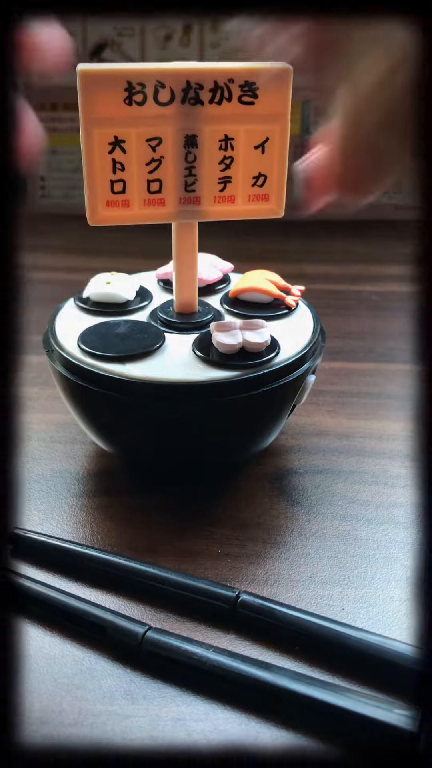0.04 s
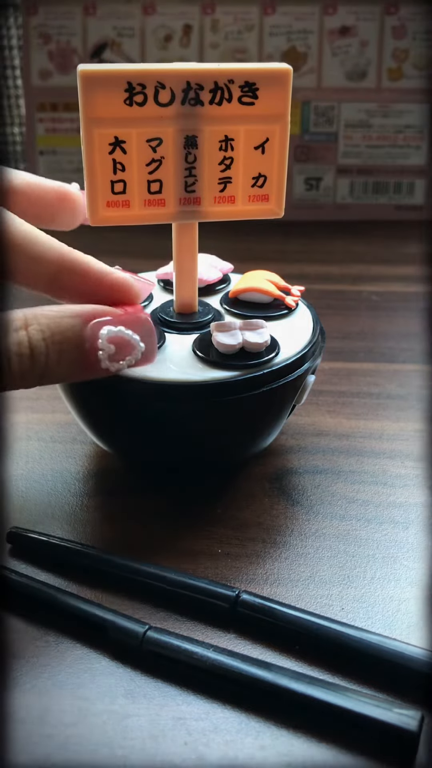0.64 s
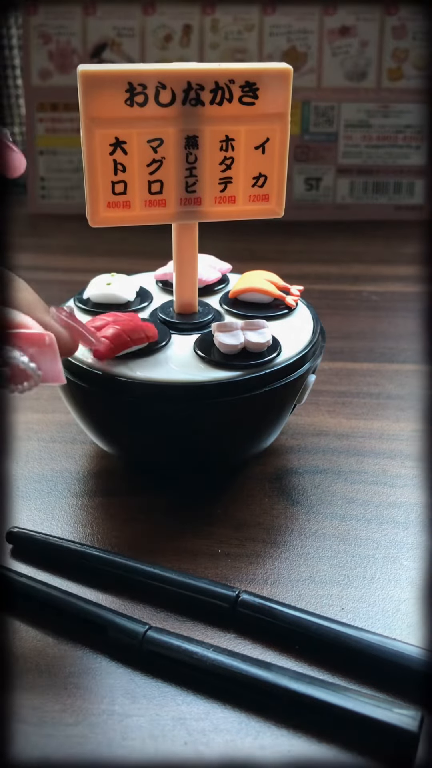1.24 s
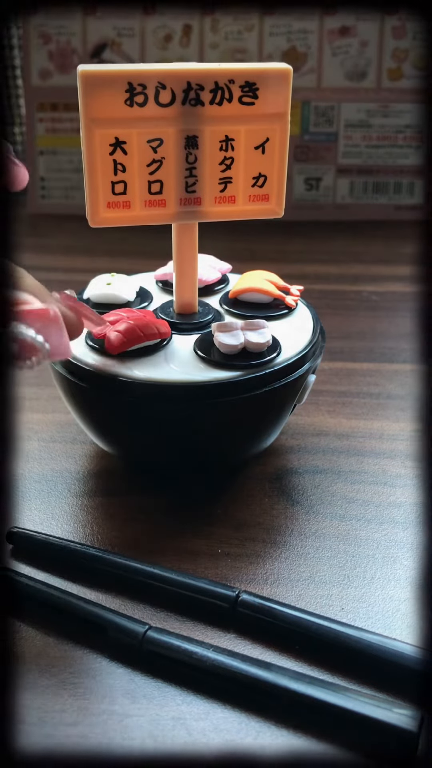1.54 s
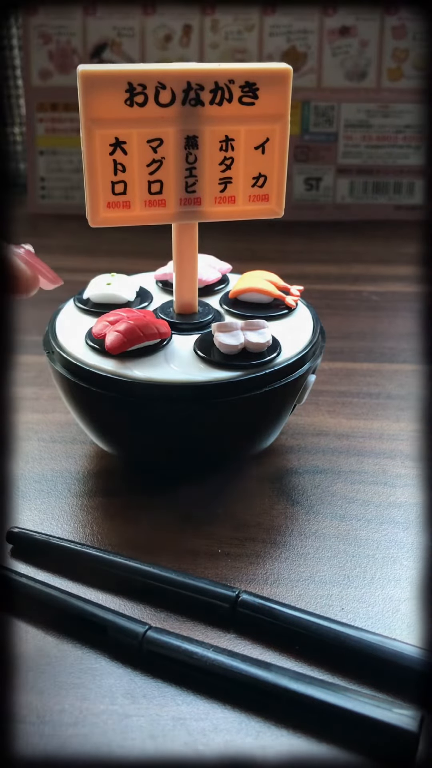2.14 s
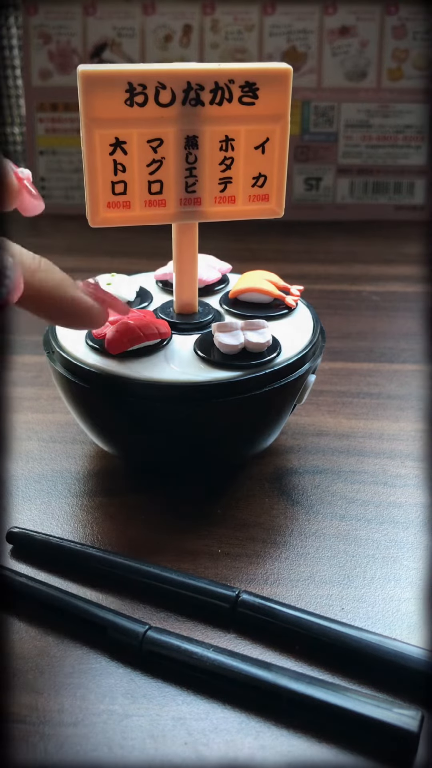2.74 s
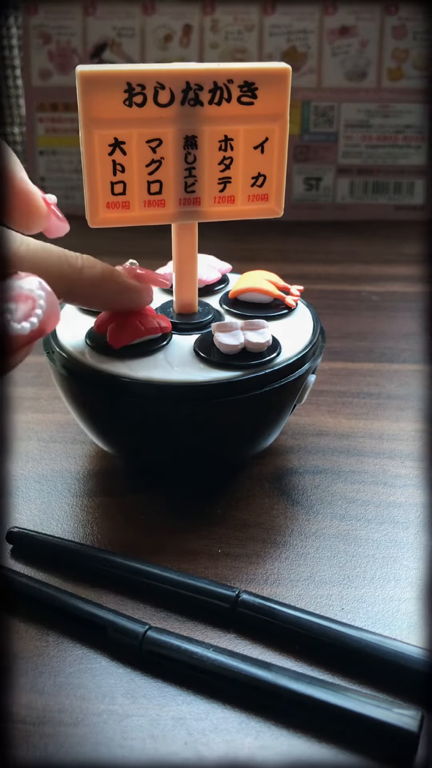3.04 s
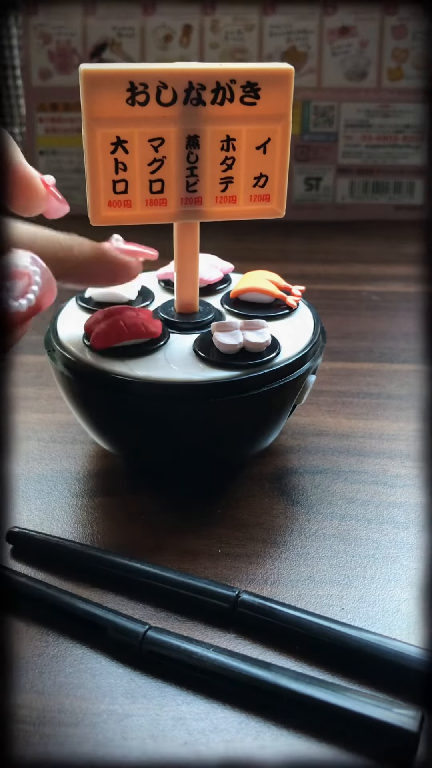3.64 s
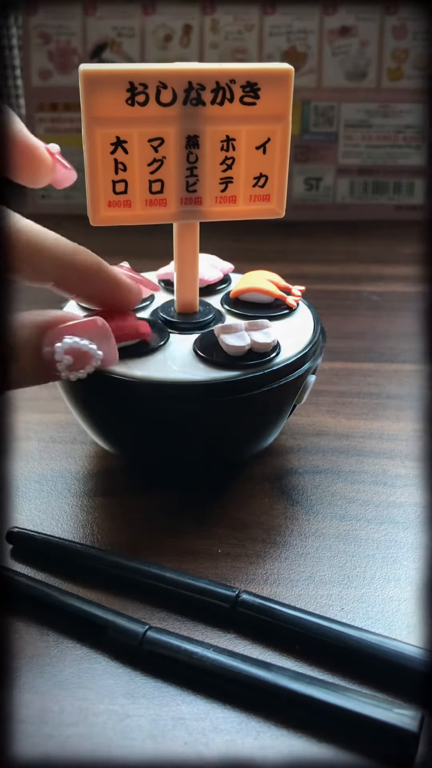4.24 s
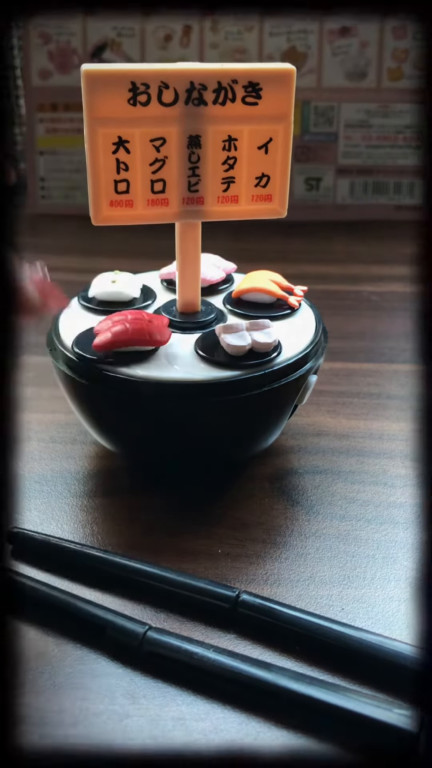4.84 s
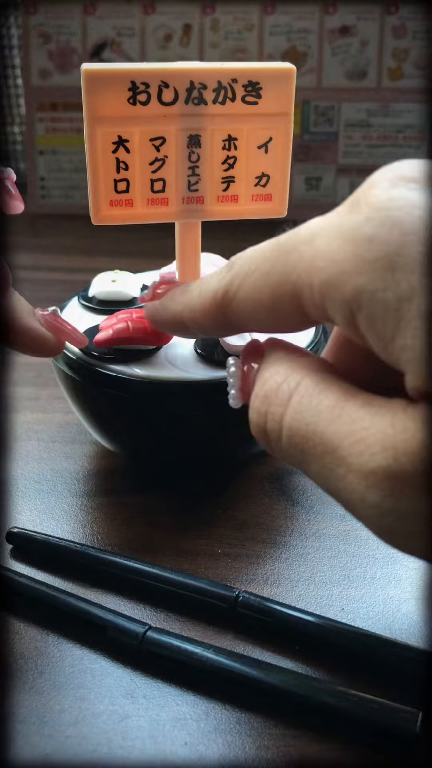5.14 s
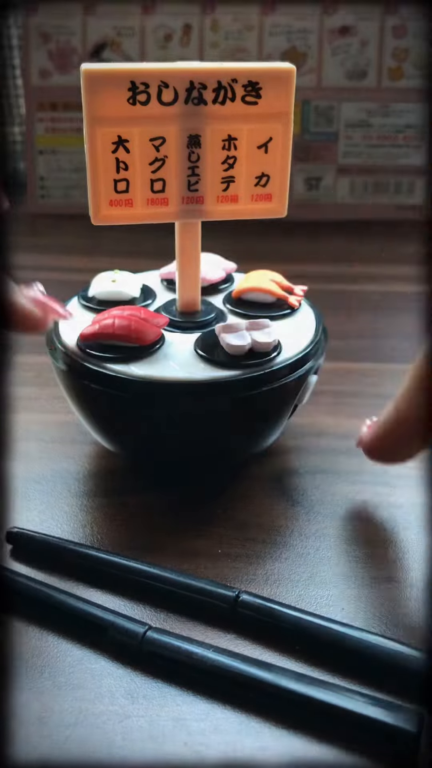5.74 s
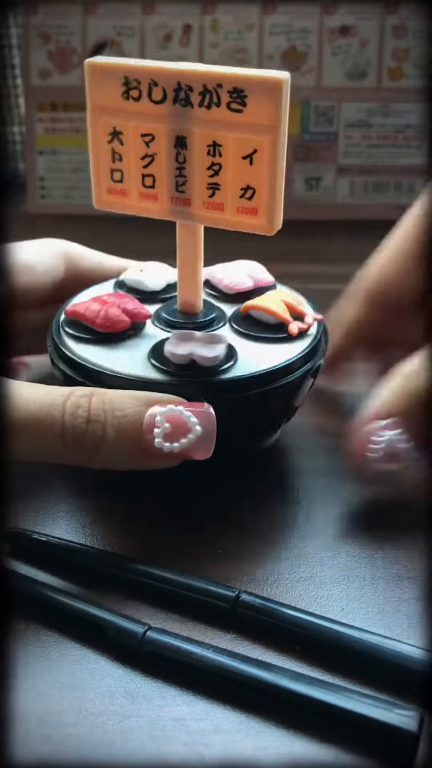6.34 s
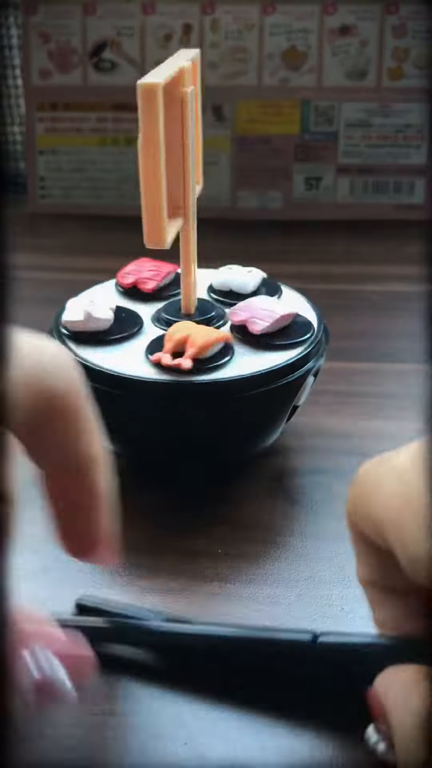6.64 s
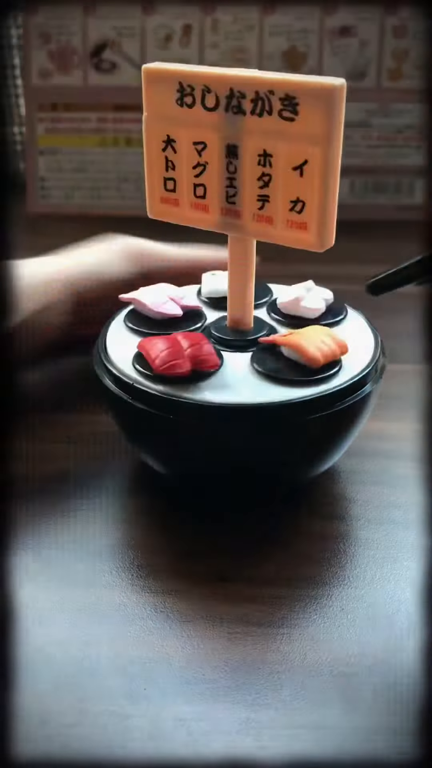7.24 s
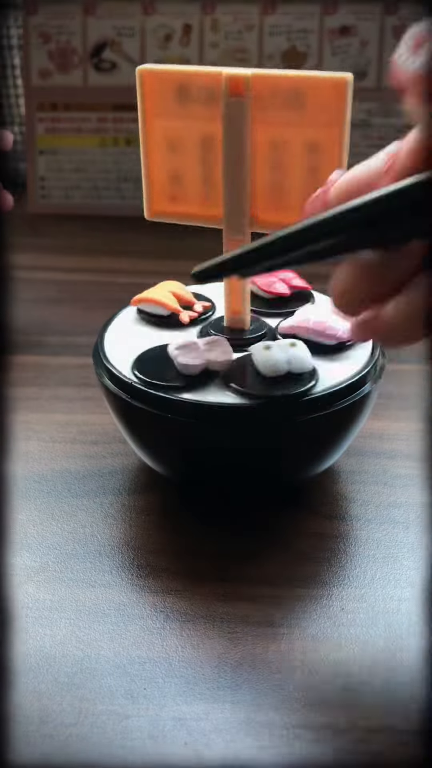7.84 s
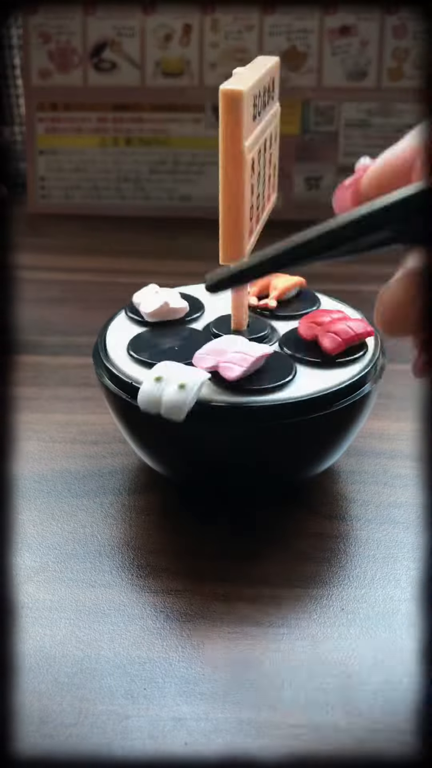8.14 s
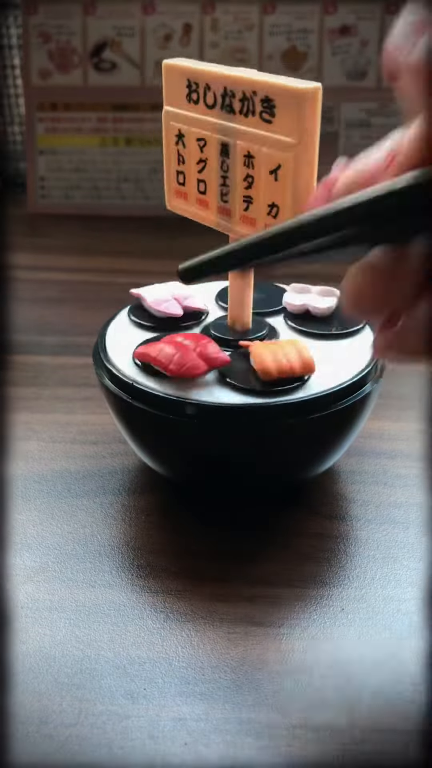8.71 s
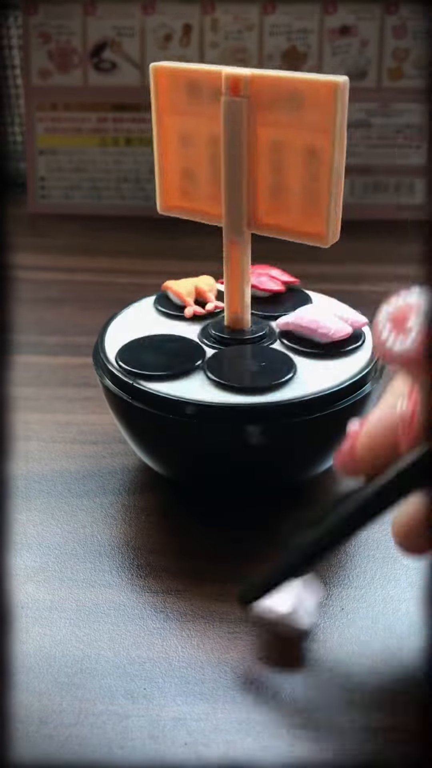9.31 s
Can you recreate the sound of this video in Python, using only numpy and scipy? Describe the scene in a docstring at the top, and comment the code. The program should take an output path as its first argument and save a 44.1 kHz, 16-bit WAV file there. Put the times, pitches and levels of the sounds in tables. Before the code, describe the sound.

Light ticks, brief scrapes and soft fingertip brushes come from a small plastic toy handled close up on a wooden table, over low room noise. Then its turntable starts to spin and a much louder, steady hiss takes over, fluttering slightly and dipping twice between pushes. Chopsticks knock and rub against the toy a few times as it turns, and the hiss lasts to the end.

```python
"""Short scrapes and clicks ring a small hollow plastic turntable on a wooden table in a quiet room.
Long nails set a piece on it and nudge the others; each contact drives the modes of bowl, deck and edges.
Then the deck is pushed round three times, hissing as plastic slides on plastic, while chopsticks poke
at the pieces. The hiss flutters, sags, snags and changes colour as the deck turns."""
import sys
import numpy as np
from scipy import signal
from scipy.fft import rfft, irfft
from scipy.io import wavfile

SR = 44100
rng = np.random.default_rng(int(sys.argv[2]) if len(sys.argv) > 2 else 0)


def file_out(sig):
    """Save sig as 16-bit WAV at sys.argv[1]."""
    # one column per channel
    cols = np.atleast_2d(sig).T
    # limit, then scale
    lim = np.clip(cols, -1, 1)
    pcm = np.round(lim * 32767).astype(np.int16)
    wavfile.write(sys.argv[1], SR, pcm)


N = 422037
TIME_S = np.arange(N) / SR
FREQS_HZ = np.arange(2049) * SR / 4096 + 1
BOWL_TOP_HZ, DECK_TOP_HZ, TOP_HZ = 613, 2190, 15850

# Modes of the toy. Each row: frequency in Hz, width in Hz, relative level in dB.
TOY_MODES = [(344.7, 35, -4.5), (445, 85, -15.5), (874, 230, -15.5), (1056, 300, -9), (1430, 130, -10),
             (1656, 620, -13), (2190, 230, -11), (2466, 270, -11.5), (3290, 1320, -10.5),
             (3530, 190, -10.5), (4140, 680, -10), (4634, 520, -4.5), (5380, 650, -3), (6097, 540, 0.5),
             (6760, 600, -3), (7660, 660, -5), (8430, 930, -5.5), (9085, 220, 0.5), (9590, 820, -4),
             (11300, 2100, -6), (12800, 500, -5), (14100, 3100, -7), (15700, 670, -24)]
# Room noise. Each row: frequency in Hz, relative density in dB.
ROOM_SPECTRUM = [(20, -34), (50, -15), (95, -14.5), (135, -3.5), (175, -0.5), (260, -3.5), (400, -6),
                 (560, -9.5), (780, -22.5), (1500, -21.5), (2300, -28.5), (4000, -38), (8000, -42),
                 (15500, -41.5)]
# Moving hands. Each row: time in seconds, level in dB.
RUSTLE_LEVELS = [(0, -71), (2.1, -69.5), (2.3, -75), (4.0, -76), (4.7, -69.5), (7.2, -73.5), (9.57, -105)]
# Thin swishes. Each row: middle in seconds, nominal length in seconds, level in dB.
SWISHES = [(.036, 0.018, -76.5), (.118, 0.064, -76.5), (.255, .02, -76), (5.852, .02, -71),
           (5.972, .012, -65)]
# Hard contacts. Each row: start in seconds, deck level in dB, edge level in dB, edge tilt in dB/octave.
CLICKS = [(0.246, -52, -72, -15), (0.264, -48, -75, 0), (0.438, -54, -71, -6), (0.796, -43, -47, 0),
          (0.8825, -58, -57, -40), (0.9523, -60, -58, -24), (1.3757, -48, -49, -24),
          (2.0112, -55, -50.5, -10), (2.12, -52, -58.5, 5), (3.4165, -61.5, -71, -5),
          (3.8473, -54, -58, -23), (3.886, -48.5, -53, -3), (3.951, -77, -65, -23), (4.0746, -57, -73, -9),
          (4.3304, -70, -67, -8), (4.378, -58, -62, -6), (4.477, -49, -49, 2), (4.5607, -49, -43, -9),
          (5.412, -53, -72, -2), (5.429, -60, -65, -18), (5.5085, -56, -63, -9), (5.59, -66, -69.5, -11),
          (5.877, -45, -65, -14), (6.0007, -48, -51, 0), (6.244, -55, -58, -7), (6.4926, -40, -23.5, 16),
          (6.497, -45, -35, 6), (6.7543, -34.5, -41, -8), (6.7604, -36, -52, -7), (6.9274, -44, -30.5, 10),
          (8.229, -32.5, -27, -9), (8.687, -35.5, -55, -8), (9.3504, -31.5, -28.5, -29)]
# Passing fingertips. Each row: middle in seconds, nominal length in seconds, level in dB.
BRUSHES = [(.262, 0.038, -54), (.295, 0.038, -60), (.889, 0.033, -49), (.915, 0.031, -48.5),
           (4.14, 0.053, -67), (4.825, 0.053, -54.5), (5.85, 0.053, -54.5), (5.879, 0.039, -47),
           (5.91, 0.085, -55)]
# Fingertip colour. Each row: frequency in Hz, relative density in dB.
BRUSH_SPECTRUM = [(400, -32), (750, -7), (1080, 4), (1450, 3), (1950, -8.5), (2400, -7.5), (3200, -17),
                  (4500, -27), (8000, -38), (15000, -37)]
# Nail drags. Each row: middle and nominal length in seconds, bowl and base edge level in dB,
# ring of the piece in Hz.
NAIL_DRAGS = [(0.807, .038, -42.5, -57, 4770), (1.069, 0.043, -76, -84, 6000),
              (1.241, .026, -55.5, -84, 4400), (1.369, 0.032, -52, -63, 4770),
              (1.482, .018, -61.5, -81, 4730), (2.014, 0.025, -63, -63.5, 3430),
              (2.121, 0.027, -54, -69.5, 4500), (3.326, .028, -53.5, -73, 6140),
              (3.419, 0.029, -57, -84, 5350), (3.483, 0.042, -59.5, -86, 5310),
              (3.642, .032, -53.5, -62, 6200), (3.851, 0.031, -55.5, -70, 4900),
              (3.886, .032, -52.5, -66.5, 4870), (3.954, .017, -68, -79.5, 5340),
              (4.078, 0.018, -57, -81, 4480), (4.334, 0.037, -59, -82, 5110),
              (4.473, .028, -53, -63.5, 4570), (4.561, 0.034, -53.5, -62.5, 5070),
              (4.69, 0.032, -56, -71.5, 4940), (5.046, 0.025, -55, -81, 4850),
              (5.439, 0.069, -59, -88, 4550), (5.509, 0.026, -58.5, -75.5, 5100),
              (6.105, 0.027, -56.5, -76, 3380), (6.179, .038, -62, -79, 4500)]
# Humming rubs. Each row: middle and nominal length in seconds, hum level in dB, hum in Hz.
RUBS = [(0.96, 0.034, -47, 1350), (2.042, 0.053, -57, 474), (2.088, 0.032, -56, 437),
        (5.966, 0.038, -55, 390), (6.008, 0.056, -50.5, 402), (6.277, 0.028, -49.5, 1044),
        (6.366, 0.048, -53.5, 347), (6.49, .036, -45.5, 1280), (7.316, .046, -45.5, 1550),
        (7.363, 0.033, -38.5, 1075), (7.367, .026, -43, 1420), (7.766, .036, -57.5, 1030),
        (7.867, 0.027, -52.5, 1045), (8.017, .044, -55, 1155), (8.103, 0.035, -51, 1090),
        (8.695, 0.027, -48.5, 1100), (8.868, 0.035, -49.5, 1045), (8.989, 0.031, -52, 1080)]
# Table bumps. Each row: middle in seconds, nominal length in seconds, level in dB.
BUMPS = [(4.87, 0.039, -64), (7.28, 0.036, -70)]
# Deck pushes. Each row: start and end in seconds, base level in dB, sag in dB/s, run-down in seconds,
# ripple rate in Hz, time in seconds when the ringing side of the seat comes round.
PUSHES = [(6.269, 7.14, -36, -5.5, .1, 12, 6.7), (7.291, 8.362, -36, -.7, 0.07, 9.9, 7.54),
          (8.345, 9.7, -36, -1.2, .05, 6.93, 8.98)]
# A hand holds and stiffens the bowl. Each row: time in seconds, grip from 0 to 1.
GRIP = [(6.48, .95), (6.56, 0.94), (7.25, 0.13)]
# Deck snags. Each row: middle in seconds, length in seconds, hiss change in dB.
SNAGS = [(6.757, .03, -5), (6.967, 0.029, -6.5), (7.384, 0.066, -4.5), (7.649, 0.019, -3),
         (8.383, 0.038, -7), (8.752, 0.061, -6), (9.042, 0.027, -8), (9.43, 0.037, -3.5)]
# Short deck jerks. Each row: middle in seconds, length in seconds, base level in dB.
JERKS = [(7.017, 0.044, -45), (7.181, 0.025, -61.5), (7.268, .011, -34), (7.305, 0.015, -55),
         (7.49, 0.15, -53.5), (8.348, 0.0088, -52), (8.408, .008, -39)]


def undb(db):
    """Decibels to gain."""
    return 10 ** (np.asarray(db) / 20)


def unit(x):
    """Scale to rms 1."""
    return x / np.sqrt(np.mean(x ** 2) + 1e-20)


def add(out, start_s, x):
    """Mix x into out."""
    i = max(int(start_s * SR), 0)
    x = x[:max(N - i, 0)]
    out[i:i + len(x)] += x


def walk(rate_hz):
    """Random points joined by lines, rms 1."""
    points = rng.standard_normal(1024)
    return unit(np.interp(TIME_S * rate_hz, np.arange(len(points)), points))


def band(hz, lo_hz, hi_hz, order=4):
    """Band-pass gain."""
    return 1 / np.sqrt((1 + (lo_hz / hz) ** (2 * order)) * (1 + (hz / hi_hz) ** (2 * order)))


def colour(hz, spectrum):
    """Gain interpolated between (Hz, dB) points."""
    points_hz, db = np.transpose(spectrum)
    return undb(np.interp(np.log(hz), np.log(points_hz), db))


def causal(gain):
    """Minimum-phase, unit-energy response for a gain over FREQS_HZ."""
    cepstrum = irfft(np.log(gain + 1e-6))
    half = len(cepstrum) // 2
    cepstrum[1:half] *= 2
    cepstrum[half + 1:] = 0
    ring = irfft(np.exp(rfft(cepstrum)))[:half]
    return ring / np.linalg.norm(ring)


def drive(force, ring, db, length_s):
    """Force through a response, with the energy of db rms held for length_s."""
    sound = signal.fftconvolve(force, ring)
    return sound / np.linalg.norm(sound) * undb(db) * np.sqrt(length_s * SR)


def background(room_db=-60.5):
    """Steady room noise and the soft rustle of hands."""
    hz = np.arange(N // 2 + 1) * SR / N + 1
    room = irfft(rfft(rng.standard_normal(N)) * colour(hz, ROOM_SPECTRUM), N)
    hands = irfft(rfft(rng.standard_normal(N)) * band(hz, 780, 990, order=2), N)
    hands_db = np.interp(TIME_S, *np.transpose(RUSTLE_LEVELS)) + 1.4 * walk(16)
    return unit(room) * undb(room_db + .5 * walk(5.3)) + unit(hands) * undb(hands_db)


def stroke(length_s, grain_db):
    """Dense, uneven micro-slips swell and fade with the pressure."""
    slips = rng.standard_normal(8192) * undb(grain_db * rng.exponential(size=8192))
    count = int(np.clip(1.55 * length_s * SR, 16, len(slips)))
    return slips[:count] * np.hanning(count)


def soft_strokes(table, gain, grain_db):
    """Contacts too soft to ring the plastic, all of one colour."""
    out, ring = np.zeros(N), causal(gain)
    for middle_s, length_s, db in table:
        force = stroke(length_s, grain_db)
        add(out, middle_s - len(force) / SR / 2, drive(force, ring, db, length_s))
    return out


def swishes():
    """Thin, high swishes, as of dry skin on skin."""
    return soft_strokes(SWISHES, band(FREQS_HZ, 6000, 15000, order=2), grain_db=3)


def resonance(hz, width_hz):
    """Gain of one mode; low bowl modes have gentler skirts and answer sooner."""
    detune = (FREQS_HZ ** 2 - hz ** 2) / (FREQS_HZ * width_hz)
    gain = 1 / (1 + detune ** 2)
    return gain ** .7 if hz < BOWL_TOP_HZ else gain


def toy_ring(lo_hz, hi_hz, spot_spread_db=0, tilt_db_oct=0, stiffening=1, floor_db=-27):
    """One register of the toy; the spot touched weights the modes, stiffening raises their pitch."""
    spots_db = spot_spread_db * rng.standard_normal(len(TOY_MODES))
    power = sum((undb(db + spot_db) * resonance(stiffening * hz, width_hz)) ** 2
                for (hz, width_hz, db), spot_db in zip(TOY_MODES, spots_db))
    tilt = undb(tilt_db_oct * np.log2(np.clip(FREQS_HZ, 4500, 13000) / 6000))
    return causal(np.sqrt(power + undb(floor_db) ** 2) * band(FREQS_HZ, lo_hz, hi_hz) * tilt)


def touch(force, levels_db, length_s, tilt_db_oct, spot_spread_db):
    """A force rings hollow bowl, flat deck and hard edges; levels_db is in that order."""
    registers = [(250, BOWL_TOP_HZ, 0), (BOWL_TOP_HZ, DECK_TOP_HZ, 0), (DECK_TOP_HZ, TOP_HZ, tilt_db_oct)]
    return sum(drive(force, toy_ring(lo_hz, hi_hz, spot_spread_db, tilt), db, length_s)
               for (lo_hz, hi_hz, tilt), db in zip(registers, levels_db))


def click(levels_db, tilt_db_oct, chatter=.24, decay_s=.001):
    """A sharp blow with brief chatter behind it."""
    force = chatter * rng.standard_normal(400) * np.exp(-TIME_S[:400] / decay_s)
    force[0] += 1
    return touch(force, levels_db, .0035, tilt_db_oct, spot_spread_db=1)


def clicks(bowl_offset_db=-8):
    """Nails and chopsticks strike deck and edges; the bowl answers more softly."""
    out = np.zeros(N)
    for start_s, deck_db, edge_db, tilt_db_oct in CLICKS:
        add(out, start_s, click((deck_db + bowl_offset_db, deck_db, edge_db), tilt_db_oct))
    return out


def brushes():
    """Fingertips brush past with a dull swish."""
    return soft_strokes(BRUSHES, colour(FREQS_HZ, BRUSH_SPECTRUM), grain_db=2)


def scrape(length_s, levels_db, ring_hz, ring_db):
    """Slips drive the toy and two modes of the touched part. Returns sound and time to mid-stroke."""
    force = stroke(length_s, grain_db=2)
    body = touch(force, levels_db, length_s, tilt_db_oct=2, spot_spread_db=2.5)
    width_hz = .17 * ring_hz
    modes = resonance(ring_hz, width_hz) + undb(-6) * resonance(.732 * ring_hz, width_hz / 2)
    part = drive(force, causal(modes * band(FREQS_HZ, 254, TOP_HZ)), ring_db, length_s)
    return body + part, len(force) / SR / 2


def nails(catch_boost_db=(2.5, 5.5, 8), lead_s=.002):
    """A nail drags over a piece and catches half way with a click."""
    out = np.zeros(N)
    for middle_s, length_s, bowl_db, edge_db, ring_hz in NAIL_DRAGS:
        deck_db = bowl_db + .32 * (edge_db - bowl_db) - 5
        levels_db = np.array([bowl_db, deck_db, edge_db - 3])
        drag, half_s = scrape(length_s, levels_db, ring_hz, ring_db=edge_db + 2)
        add(out, middle_s - half_s - lead_s, drag)
        add(out, middle_s, click(levels_db + catch_boost_db, tilt_db_oct=-7))
    return out


def rubs(body_offsets_db=(-5, -2.5, -17), lead_s=.0035):
    """Plastic rubs on plastic or wood and one part hums; the force leads as the hum builds."""
    out = np.zeros(N)
    for middle_s, length_s, hum_db, hum_hz in RUBS:
        rub, half_s = scrape(length_s, hum_db + np.array(body_offsets_db), hum_hz, hum_db)
        add(out, middle_s - half_s - lead_s, rub)
    return out


def bumps():
    """Soft, low bumps against the table."""
    return soft_strokes(BUMPS, band(FREQS_HZ, 35, 85), grain_db=0)


def pulse(middle_s, length_s):
    """Gaussian of height 1."""
    return np.exp(-np.minimum((2 * (TIME_S - middle_s) / length_s) ** 2, 50))


def deck_motion(attack_s=.018, turn_s=1.67, run_down_db=-37, ripple_db=.04):
    """Sliding strength and deck angle: each push starts fast, sags and runs down."""
    strength, angle_rad = np.zeros(N), np.zeros(N)
    for start_s, end_s, db, sag_db_per_s, run_down_s, ripple_hz, ringing_s in PUSHES:
        age_s = np.clip(TIME_S - start_s, 0, end_s - start_s)
        gate = np.clip(np.minimum(TIME_S - start_s, end_s - TIME_S) / attack_s + .5, 0, 1)
        stopping = np.clip(1 - (end_s - TIME_S) / run_down_s, 0, 1) ** 1.55
        ripple = np.cos(2 * np.pi * ripple_hz * age_s)
        strength += gate * undb(db + sag_db_per_s * age_s + run_down_db * stopping + ripple_db * ripple)
        pushed = TIME_S > start_s - attack_s
        angle_rad[pushed] = 2 * np.pi * (TIME_S[pushed] - ringing_s) / turn_s
    snags_db = sum(db * pulse(middle_s, length_s) for middle_s, length_s, db in SNAGS)
    jerks = sum(undb(db) * pulse(middle_s, length_s) for middle_s, length_s, db in JERKS)
    return strength * undb(snags_db) + jerks, angle_rad


def slide(lo_hz, hi_hz, flicker_db, stiffening=1):
    """Slips merge into a hiss in one register of the toy, rms 1."""
    ring = toy_ring(lo_hz, hi_hz, stiffening=stiffening, floor_db=-31.5)
    hiss = signal.oaconvolve(rng.standard_normal(N), ring)[:N]
    return unit(hiss * undb(flicker_db * walk(30)))


def rim_slide(lo_hz, hi_hz, grip):
    """Hiss in the high modes, which sit a little higher while the bowl is held."""
    free = slide(lo_hz, hi_hz, flicker_db=2)
    held = slide(lo_hz, hi_hz, flicker_db=1, stiffening=1.033)
    return np.sqrt(1 - grip) * free + np.sqrt(grip) * held


def seat_ring(angle_rad, grip):
    """The 6 kHz ring trades with lower hiss once a turn, 9 kHz swells twice; grip dulls the top."""
    once, twice = np.cos(angle_rad), np.cos(2 * angle_rad)
    lower = undb(-8.5 - 1.3 * once + grip) * slide(2020, 4790, flicker_db=2.5)
    rim = undb(-13.5 + 3.7 * grip) * slide(4700, 5000, flicker_db=.5)
    rim += undb(-14.5 + 2 * once) * slide(5300, 5600, flicker_db=5)
    ring = undb(-4 + 3.2 * once - 8.5 * grip) * rim_slide(6080, 7040, grip)
    upper = undb(-7.5 - 2.3 * twice + 3.2 * grip) * rim_slide(8200, 9300, grip)
    top = undb(-7 + .7 * once - 5.1 * grip) * rim_slide(12000, 19000, grip)
    peak = undb(-13.5 + 5.3 * once) * slide(6200, 6400, flicker_db=3.5)
    return lower + rim + ring + peak + upper + top


def spin():
    """The deck slides on its seat; motion sets the hiss level, angle its colour."""
    strength, angle_rad = deck_motion()
    grip = np.interp(TIME_S, *np.transpose(GRIP))
    deck = undb(-13 - .51 * np.cos(angle_rad)) * slide(600, 3170, flicker_db=1.8)
    hum = undb(-25) * slide(870, 1180, flicker_db=4.5)
    bowl = undb(-25 + 4 * grip) * slide(183, 710, flicker_db=3)  # grip presses deck and bowl together
    flutter_db = .95 * walk(90) + .61 * walk(20)  # uneven seat
    return strength * undb(flutter_db) * (seat_ring(angle_rad, grip) + deck + hum + bowl)


def sign_echo(hiss, lag_s=.0016, sway_s=.00005, gain=.16):
    """A menu sign riding the deck reflects the hiss; the wandering lag makes shifting comb ripples."""
    delay_s = lag_s + sway_s * walk(4)
    echo = np.interp(TIME_S - delay_s, TIME_S, hiss)
    return (hiss + gain * echo) / np.sqrt(1 + gain ** 2)


def scene():
    """Room, touches and spinning deck, the same in both channels."""
    soft = brushes() + bumps() + swishes()
    mono = soft + nails() + rubs() + clicks() + background() + sign_echo(spin())
    return np.array([mono, mono])


def record(dry):
    """Steep low-pass at TOP_HZ."""
    return signal.sosfilt(signal.ellip(10, .2, 70, TOP_HZ, fs=SR, output="sos"), dry)


dry = scene()
out = record(dry)
file_out(out)
```